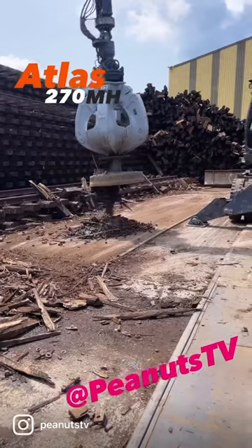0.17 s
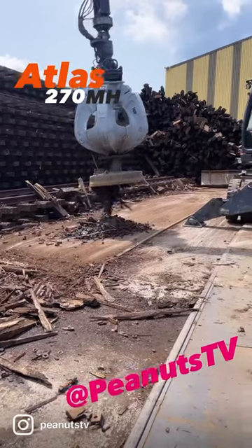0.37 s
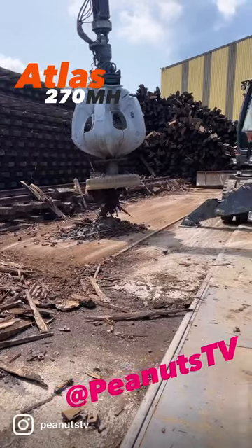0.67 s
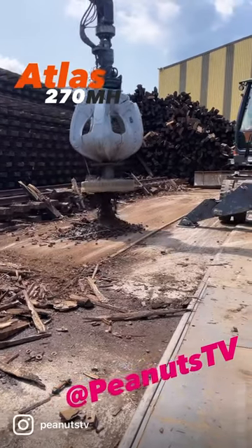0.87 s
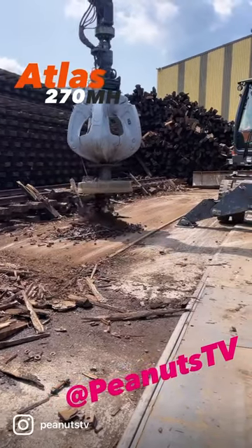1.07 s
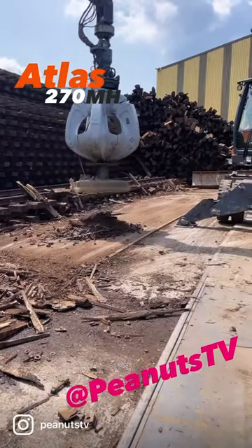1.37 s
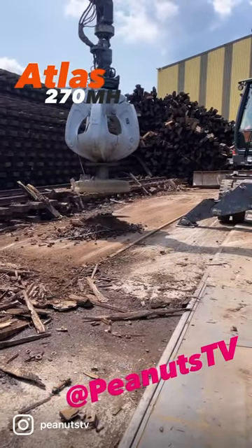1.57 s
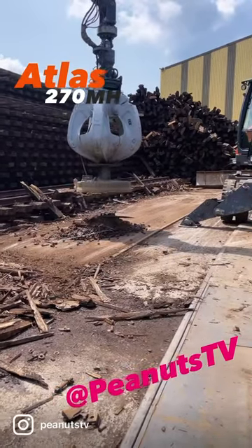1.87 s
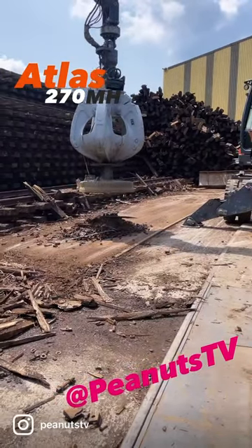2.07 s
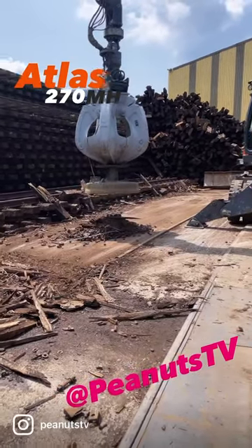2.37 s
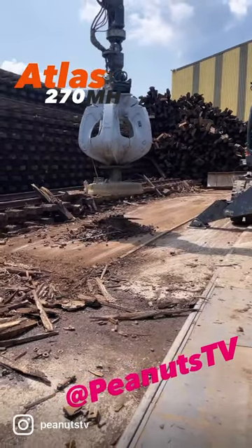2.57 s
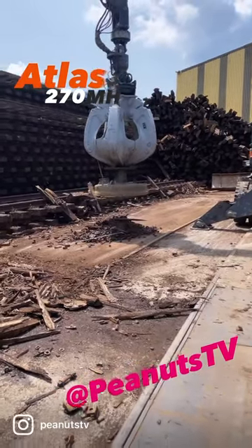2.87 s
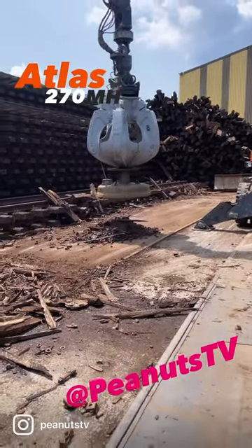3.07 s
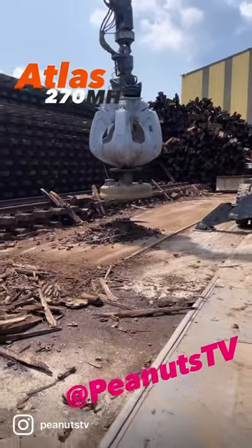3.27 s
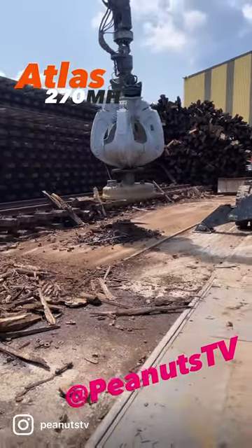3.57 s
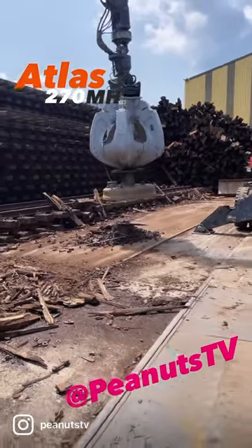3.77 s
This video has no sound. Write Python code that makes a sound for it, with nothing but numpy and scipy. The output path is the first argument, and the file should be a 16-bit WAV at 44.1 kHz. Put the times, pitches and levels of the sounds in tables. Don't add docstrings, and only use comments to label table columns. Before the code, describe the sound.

Scrap metal drops in one quick, ringing burst, rattles and settles on the pile, leaving only low machine hum and fan hiss; outdoor scrap yard, phone microphone at some distance, slight echo.

```python
import sys
import numpy as np
from scipy import signal
from scipy.fft import rfft, irfft, next_fast_len
from scipy.io import wavfile
from scipy.ndimage import uniform_filter1d, map_coordinates

SR = 44100
rng = np.random.default_rng(int(sys.argv[2]) if len(sys.argv) > 2 else 0)


def bounce(signal):
    frames = np.transpose(np.atleast_2d(signal))
    limited = np.clip(frames, -1, 1)
    pcm = np.round(limited * 32767).astype(np.int16)
    wavfile.write(sys.argv[1], SR, pcm)


def attenuation_scalar(level_db):
    decades = np.asarray(level_db, float) / 20
    return 10 ** decades


N = 172872

# time [s], strength [dB].
POUR_DB = [
    (.68, -34),
    (.75, -27.5),
    (.85, -21),
    (1.0, -20),
    (1.14, -21),
    (1.19, -28.5),
    (1.4, -32),
    (1.6, -31),
    (1.8, -45.5),
    (2.3, -33),
]
# frequency [Hz], level [dB].
STEEL_COLOUR = [(1200, -26.5), (2100, -2.5), (3000, -0.5), (3700, -1.5), (4500, 5), (5300, 1), (6000, -4.5),
                (15800, -8)]
# time [s], peak
# [dB], ring [Hz], time until muffled [s].
RINGING_HITS = [(0.768, -16, 4750.0, 0.024), (0.791, -32, 4260, 0.089), (0.795, -19, 4450, 0.033),
                (0.802, -26, 4960.0, 0.035), (0.833, -25, 2610, 0.024), (0.838, -20, 5220.0, 0.026),
                (0.85, -26, 4790.0, 0.022), (0.856, -30, 5400, 0.042), (0.862, -26, 10280.0, 0.028),
                (0.869, -27, 4190, 0.012), (0.906, -28, 2090, 0.046), (0.907, -29, 5040, 0.068),
                (0.909, -24.0, 3390, 0.029), (0.909, -15, 2070.0, 0.0091), (0.911, -31, 2840.0, 0.013),
                (0.913, -33, 4580, 0.043), (0.917, -28, 4280, 0.062), (0.921, -15, 4150.0, 0.008),
                (0.94, -21.0, 4900, 0.022), (0.946, -25, 4130.0, 0.009), (0.947, -37, 9800, 0.018),
                (0.967, -26, 4150.0, 0.019), (0.983, -29, 3450.0, 0.067), (0.984, -24.5, 3350, 0.031),
                (0.989, -23.0, 4200, 0.013), (0.996, -31, 3460.0, 0.057), (1.006, -24.0, 3360, 0.021),
                (1.005, -20, 2170.0, 0.0041), (1.004, -22.0, 4500, 0.026), (1.015, -31, 4170.0, 0.016),
                (1.016, -25, 9940.0, 0.019), (1.046, -28, 4320.0, 0.107), (1.049, -15, 4390.0, 0.029),
                (1.067, -21, 12010.0, 0.01), (1.071, -28, 3185, 0.032), (1.076, -29, 4960.0, 0.029),
                (1.099, -20.5, 4550, 0.037), (1.112, -29.5, 2123, 0.039), (1.115, -20, 4100, 0.015),
                (1.116, -27.5, 1896, 0.018), (1.12, -22, 4940, 0.04), (1.121, -25, 4280, 0.048),
                (1.121, -20, 4890.0, 0.026), (1.126, -22, 5070, 0.022), (1.127, -24.5, 3380, 0.016),
                (1.148, -22, 4130, 0.017),
                (1.133, -38, 4100.0, 0.067), (1.134, -35, 4400, 0.063), (1.186, -35, 5000.0, 0.065),
             (1.19, -28.0, 5060, 0.018), (1.193, -30.0, 3510.0, 0.026), (1.198, -29.0, 4630, 0.013),
             (1.212, -36.0, 11660.0, 0.027), (1.214, -31.0, 4250, 0.027), (1.221, -35, 2810, 0.031),
             (1.222, -36, 1840.0, 0.03), (1.226, -33, 4410, 0.039), (1.259, -30, 4970, 0.019),
             (1.298, -31, 4940, 0.0074), (1.322, -33.0, 4450, 0.032), (1.327, -38, 8830, 0.021),
             (1.331, -29.5, 2240, 0.0056), (1.331, -37, 5020, 0.093), (1.333, -25, 5010, 0.017),
             (1.442, -24, 4160, 0.017), (1.462, -33.0, 2120, 0.01), (1.468, -31, 4970, 0.026),
             (1.488, -35, 1820, 0.012), (1.489, -33.0, 2180, 0.017), (1.49, -34, 2860, 0.016),
             (1.499, -29, 4880, 0.014), (1.525, -30.5, 4980.0, 0.055), (1.575, -34.0, 4430.0, 0.019),
             (1.582, -23.5, 4140, 0.02), (1.613, -45, 10080.0, 0.045), (1.615, -29.5, 10060.0, 0.016),
                (0.702, -38, 5450, .015), (0.743, -22, 4110, .012), (1.737, -38, 5530, 0.034),
                 (1.826, -42, 5530, 0.07), (1.856, -35.5, 4320, 0.035), (1.874, -36, 4550, 0.027),
                 (1.883, -32, 5060, 0.027), (1.94, -45, 5080, 0.047), (1.991, -42, 4940, 0.031),
                 (2.007, -39, 4327, 0.1), (2.096, -34, 4284, 0.025), (.99, -31, 657, 0.027),
                 (1.11, -33, 762, .07), (2.15, -45.5, 4280, 0.092), (2.18, -52, 4990, 0.083),
                 (3.55, -50, 3460, .07)]
# time [s], peak [dB], centre [Hz].
DULL_KNOCKS = [(0.796, -20, 2880), (0.816, -20, 2180), (0.8694, -25, 2940), (0.9344, -11, 2020),
               (0.98, -19, 3360), (1.0051, -9, 2800), (1.0205, -5.5, 3050), (1.0864, -13, 2940),
               (1.1143, -14, 1920), (1.1359, -11.5, 2260), (1.2194, -12, 2830), (1.3317, -25, 2320),
               (1.3732, -18, 3180), (1.4611, -16, 2400), (1.4895, -17, 2520), (1.8408, -22, 2840)]
# frequency [Hz], level [dB], T60 [s].
BAR_MODES = [(3820, -2, 0.074), (5082, -3, 0.086), (5530, -3.5, 0.15), (5852, -7.5, 0.23), (6500, 1, 0.31),
             (6920, 3, 0.069), (9060, 1.5, 0.18), (10070, -8.5, 0.23), (10400, -7, 0.13), (10900, -6, 0.15)]
# frequency [Hz], T60 [s].
YARD_T60 = [(500, 0.47), (3000, 0.38), (12000, 0.37)]
# frequency [Hz], left over right [dB].
HEAP_LEAN = [(2000, 1), (2800, 7), (3550, -4), (4100, 0)]
# frequency [Hz], likeness [-1..1].
STEEL_LIKENESS = [(600, 0.8), (2800, 0.48), (3800, 0.33), (5500, 0.99), (14000, 0.13)]
# frequency [Hz], likeness [-1..1].
MACHINE_LIKENESS = [(60, 1), (280, 0.98), (590, 0.78), (1300, 0.67), (2700, 0.07), (4500, 0.3),
                    (7000, 0.94), (14000, 0.12)]
# time [s], level [dB].
MACHINE_DB = [
    (0, -22),
    (.34, -20.5),
    (.8, -21),
    (1.19, -28.5),
    (1.44, -28),
    (1.72, -25),
    (2.15, -26),
    (2.57, -22),
    (3.5, -22.5),
    (3.92, -21.5),
]
# time [s], rate [Hz].
PUMP_RATE = [(0, 90.37), (2.2, 90.07), (3.92, 87.83)]
# multiple of the rotation [-], level [dB].
PUMP_ORDERS = [(1, -4.5), (2, -21), (3, -12.5), (6, -19.5), (9, -22), (12, -27.5), (21, -26.5), (24, -29)]
# multiple of the firing rate [-], level [dB].
FIRING_ORDERS = [(.4, -14.5), (1, -1), (2, -20), (3, -21.5), (4, -22.5)]
# frequency [Hz], density [dB per Hz].
ROAR_SPECTRUM = [(15, -45), (25, -25.5), (65, -4), (151, -3), (206, -8.5), (270, -12.5), (394, -15.5),
                 (615, -12.5), (1500, -28.5), (3300, -120)]
# frequency [Hz], density [dB per Hz].
HISS_SPECTRUM = [(880, -26), (1500, -1), (2460, -1), (4640, -12.5), (5310, -11), (8490, -16), (9990, -16.5),
                 (11300, -20), (13000, -21.5), (22000, -120)]
# frequency [Hz], phase [rad].
PORT_LAG = [(0, 0), (1400, 0), (2100, 1.4), (2450, 2.1), (2800, 4), (3400, 5.3), (4050, 7.1), (4900, 6.45),
            (5450, 6.5), (7650, 9.4), (11000, 12.6), (14400, 15.7), (16000, 17)]
# from [Hz], to [Hz], gain [dB].
SUM_BANDS = [(7000, 8150, -45), (8150, 8600, -7), (12450, 13450, -7), (13450, 15800, -40)]
# from [Hz], to [Hz], gain [dB].
DIFFERENCE_BANDS = [(5200, 5700, -14), (10400, 11750, -45)]

RISE_S, CRACK_T60_S = 0.0012, 0.012


def unit(x):
    return x / np.sqrt(np.mean(x ** 2) + 1e-20)


def along(points, hz):
    f, v = np.transpose(points)
    return np.interp(np.log(hz + 1), np.log(f + 1), v)


def curve(rows):
    return np.interp(np.arange(N) / SR, *np.transpose(rows))


def wobble(rate_hz):
    knots = rng.standard_normal(int(N * rate_hz / SR) + 4)
    return map_coordinates(knots, [np.arange(N) * rate_hz / SR])


def filtered(x, response):
    m = next_fast_len(N + SR // 2)
    return irfft(rfft(x, m) * response(np.fft.rfftfreq(m, 1 / SR)), m)[..., :N]


def spread(pair, alike):
    def weights(hz):
        turn = np.arccos(np.clip(along(alike, hz), -1, 1)) / 2
        return np.array([np.cos(turn), np.sin(turn)])
    mid, side = filtered(pair, weights)
    return np.array([mid + side, mid - side])


def shine(x):
    return filtered(x, lambda hz: attenuation_scalar(along(STEEL_COLOUR, hz)) * (hz > 900))


def strike(out, s, db, hz, t60, crack_db, length_s=.3, crack_t60=CRACK_T60_S):
    t = np.arange(int(length_s * SR)) / SR
    decay = attenuation_scalar(db[:, None] - 60 * t / np.maximum(t60, .01)[:, None])
    modes = decay * np.sin(2 * np.pi * hz[:, None] * t)
    crack = attenuation_scalar(crack_db - 60 * t / crack_t60) * rng.standard_normal(len(t))
    out[:, round(s * SR):][:, :len(t)] += [modes.sum(0) * (1 - np.exp(-t / RISE_S)), crack]


def pour(count=380):
    size_db, t60_s, crack_db = 3, 0.14, -14
    grit_db, grit_per_s, grit_size_db = -13, 1500, 3
    heap_hz, heap_width, heap_db = 780, 0.71, -14
    start_s, end_s = POUR_DB[0][0], POUR_DB[-1][0]
    out, level = np.zeros((2, N + SR)), curve(POUR_DB)
    for row in rng.random((count, 10)):
        s = start_s + 1.2 * row[0] ** 1.2
        hz = 1300 * 11 ** row[2:6]
        piece_db = level[int(s * SR)] - size_db * np.log(row[1] + 1 / 10)
        db = piece_db + along(STEEL_COLOUR, hz) - 8.0 + 3.8 * (hz > 6000)
        strike(out, s, db, hz, t60_s * (.4 + 1.2 * row[6:]), db.max() + crack_db, length_s=.15)
    draws = rng.random((2, N))
    grain = attenuation_scalar(-grit_size_db * np.log(draws[1] + 0.19)) * rng.standard_normal(N)
    grit = (draws[0] < grit_per_s / SR) * grain
    window = curve([(start_s, 0), (start_s + 0.021, 1), (end_s - .2, 1), (end_s, 0)])
    heap = unit(filtered(grit, lambda hz: np.exp(-(np.log((hz + 1) / heap_hz) / heap_width) ** 2)))
    heap = attenuation_scalar(level + heap_db) * window * heap
    bright = attenuation_scalar(level + grit_db + 2.2 * wobble(40.15)) * window * unit(shine(grit))
    return heap + out[0, :N] + shine(out[1, :N]) + bright


def rings():
    free_loss_db, muffle_t60_s, tick_db = 2.5, 0.037, -12
    out, t = np.zeros((2, N + SR)), np.arange(SR // 4) / SR
    for s, db, hz, free_s in RINGING_HITS:
        free_s = max(free_s, .003)
        heard = max(abs(np.cos(np.interp(hz, *np.transpose(PORT_LAG)) / 2)), .55)
        fade_db = free_loss_db * np.minimum(t / free_s, 1)
        fade_db = fade_db + 60 * np.maximum(t - free_s, 0) / muffle_t60_s
        twin = 1 + 0.32 * np.cos(2 * np.pi * hz * t * rng.normal(0, .008))
        rise = 1 - np.exp(-t / (RISE_S + 0.057 * free_s))
        ring = attenuation_scalar(db - fade_db) / heard * twin * rise * np.sin(2 * np.pi * hz * t)
        tick = attenuation_scalar(db + tick_db - 60 * t / CRACK_T60_S) * rng.standard_normal(len(t))
        out[:, round(s * SR):][:, :len(t)] += [ring, tick]
    return attenuation_scalar(2.0 * wobble(60.53)) * out[0, :N] + shine(out[1, :N])


def knocks(out):
    t60_s, mode_spread = 0.018, 0.249
    for s, db, centre_hz in DULL_KNOCKS:
        row = rng.standard_normal((2, 12))
        hz = centre_hz * np.exp(mode_spread * row[1])
        strike(out, s, db - 9.5 + 2 * row[0], hz, t60_s + 0 * row[0], db - 8, length_s=.08)


def long_bar(out):
    land_s, bounce_s, bar_db, crack_db = 1.6775, .013, -24.5, 12.5
    hz, db, t60 = np.transpose(BAR_MODES)
    pairs_hz = np.append(hz, hz * (1 + 0.023 * rng.standard_normal(len(hz))))
    pairs_db = bar_db - 0.5 + np.append(db, db + 1)
    pairs_t60 = np.minimum(np.append(t60, .5 * t60), .2)
    for s in (land_s, land_s + bounce_s):
        strike(out, s, pairs_db, pairs_hz, pairs_t60, bar_db + crack_db, crack_t60=0.075)


def first_snap():
    snap_s, snap_db, t60_s = .7408, -1, 0.015
    t = np.abs(np.arange(N) / SR - snap_s)
    return attenuation_scalar(snap_db - 60 * t / t60_s) * (np.arange(N) >= snap_s * SR) * rng.standard_normal(N)


def pieces():
    out = np.zeros((2, N + SR))
    knocks(out)
    long_bar(out)
    return attenuation_scalar(3 * wobble(70)) * out[0, :N] + shine(out[1, :N] + first_snap())


def yard(x):
    hz, t, z = signal.stft(rng.standard_normal((2, SR // 2)), SR, nperseg=256)
    tail = signal.istft(z * attenuation_scalar(-60 * t / along(YARD_T60, hz)[:, None]), SR, nperseg=256)[1]
    delayed = np.pad(x, (400, 0))[None]
    return signal.fftconvolve(delayed, tail / np.linalg.norm(tail[0]), axes=1)[:, :N]


def heap_scatter(x):
    t = np.arange(SR // 10) / SR
    scatter = attenuation_scalar(-60 * t / 0.02) * rng.standard_normal(len(t))
    return signal.fftconvolve(x, scatter / np.linalg.norm(scatter))[:N]


def orders(hz, table):
    unsteady_db, drift = 0.9, 0.002
    phase = 2 * np.pi * np.cumsum(hz * (1 + drift * wobble(6))) / SR
    total = np.zeros(N)
    for k, db in table:
        gain = attenuation_scalar(db + 1 + unsteady_db * wobble(9))
        total += gain * np.sin(k * phase + rng.uniform(0, 6.76))
    return total


def rush(spectrum, patchy_db):
    z = signal.stft(rng.standard_normal((2, N)), nperseg=512)[2]
    field = uniform_filter1d(rng.standard_normal(z.shape[1:]), 5, 0)
    field = uniform_filter1d(field, 10, 1)
    pair = signal.istft(z * attenuation_scalar(patchy_db * unit(field)), nperseg=512)[1][:, :N]
    low_hz, high_hz = spectrum[0][0], spectrum[-1][0]
    return unit(filtered(pair, lambda hz: attenuation_scalar(along(spectrum, hz)) * (hz > low_hz) * (hz < high_hz)))


def hydraulic_jolt():
    jolt_s, jolt_hz, jolt_db, length_s = .25, 111, -8.5, 0.012
    t = np.arange(N) / SR - jolt_s
    return -attenuation_scalar(jolt_db) * np.exp(-(t / length_s) ** 2) * np.cos(2 * np.pi * jolt_hz * t)


def machine():
    firing_hz, roar_db, hiss_db = 151.9, -4.5, -18
    tones = orders(firing_hz + np.zeros(N), FIRING_ORDERS) + orders(curve(PUMP_RATE), PUMP_ORDERS)
    noise = attenuation_scalar(roar_db) * rush(ROAR_SPECTRUM, patchy_db=1.5)
    noise = noise + attenuation_scalar(hiss_db) * rush(HISS_SPECTRUM, patchy_db=0.8)
    drone = spread(noise + tones * [[1], [-.8]], MACHINE_LIKENESS)
    return attenuation_scalar(curve(MACHINE_DB)) * drone + hydraulic_jolt()


def scene():
    echo_gain = attenuation_scalar(-7.5)
    steel = pour() + pieces() + rings()
    echo, other_echo = yard(steel)
    smear = heap_scatter(steel)
    near = spread(np.array([steel + echo_gain * echo, smear + echo_gain * other_echo]), STEEL_LIKENESS)
    leaning = filtered(near, lambda hz: attenuation_scalar(np.outer([.5, -.5], along(HEAP_LEAN, hz))))
    return leaning + machine()


def band_cuts(x, bands):
    return filtered(x, lambda hz: attenuation_scalar(sum(db * (hz > lo) * (hz < hi) for lo, hi, db in bands)) / 2)


def low_pass(x):
    return signal.sosfilt(signal.butter(12, 15800, fs=SR, output="sos"), x)


def record(dry):
    top_hz, ceiling = 15800, .75

    def ports(hz):
        lag = np.interp(hz, *np.transpose(PORT_LAG)) / 2
        return (hz < top_hz) * np.exp(1j * np.array([lag, -lag]))
    left, right = ceiling * np.tanh(filtered(dry, ports) / ceiling)
    mid = band_cuts(left + right, SUM_BANDS)
    side = band_cuts(left - right, DIFFERENCE_BANDS)
    return low_pass(np.array([mid + side, mid - side]))


dry = scene()
out = record(dry)
bounce(out)
```